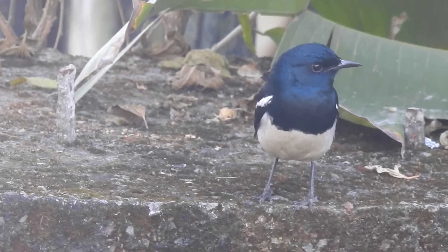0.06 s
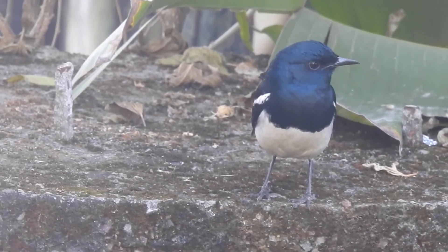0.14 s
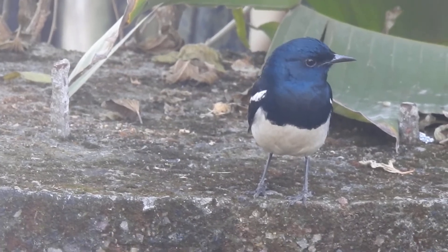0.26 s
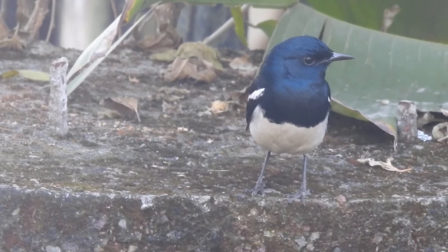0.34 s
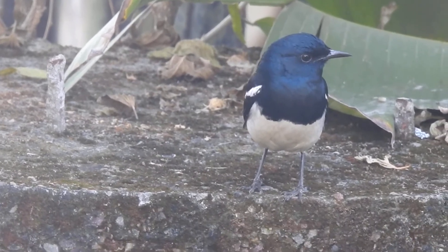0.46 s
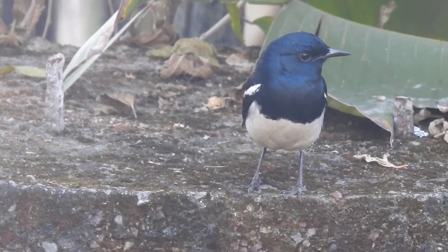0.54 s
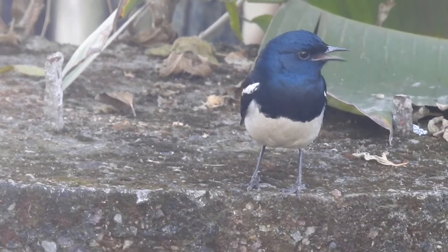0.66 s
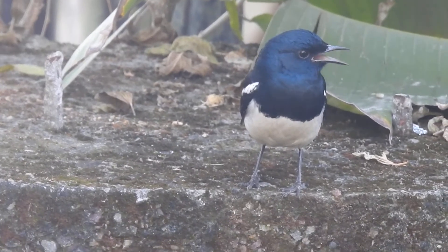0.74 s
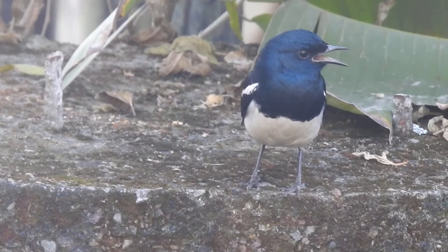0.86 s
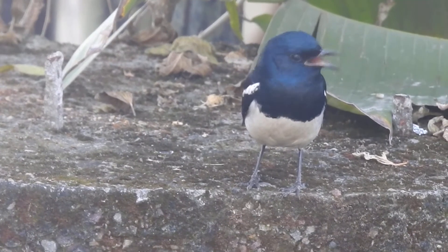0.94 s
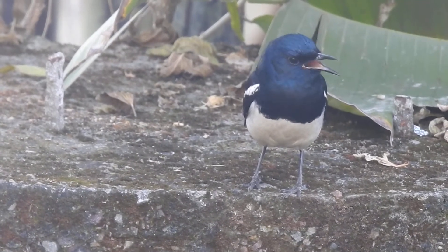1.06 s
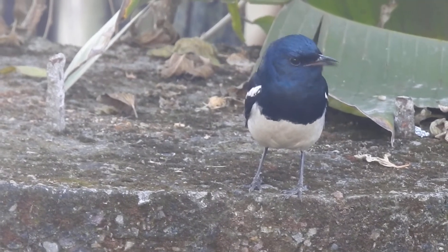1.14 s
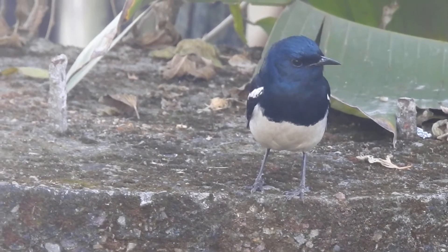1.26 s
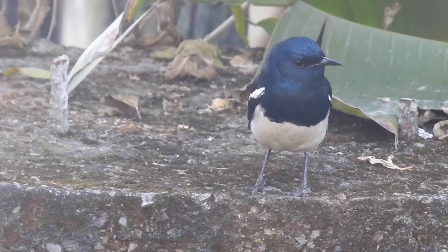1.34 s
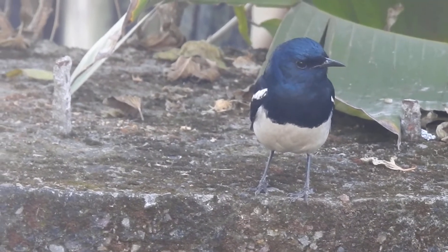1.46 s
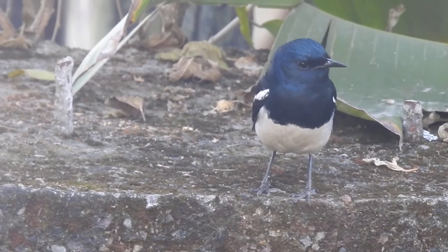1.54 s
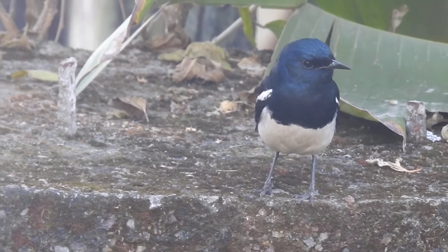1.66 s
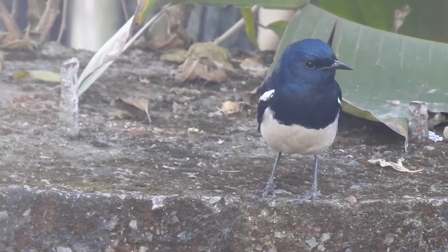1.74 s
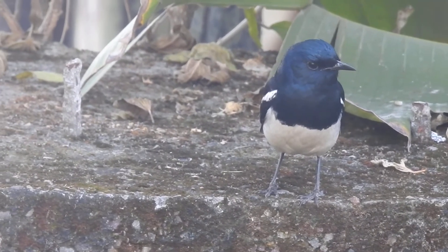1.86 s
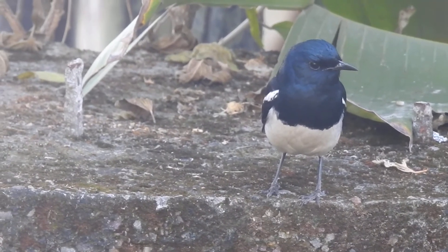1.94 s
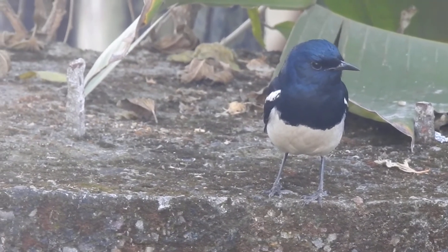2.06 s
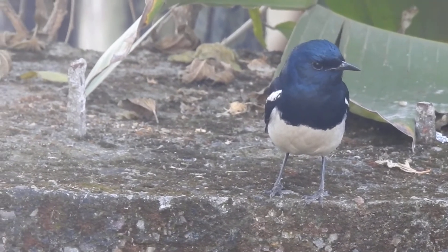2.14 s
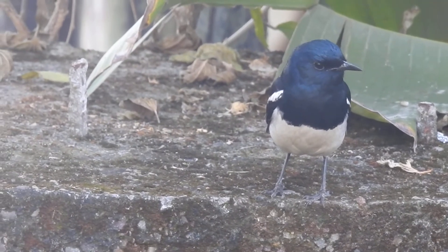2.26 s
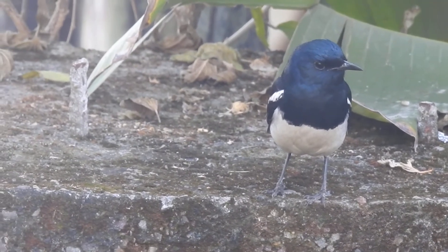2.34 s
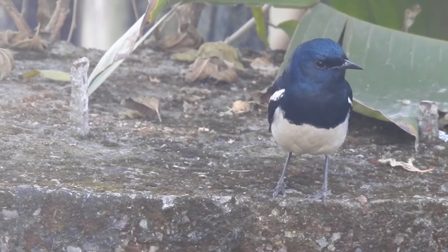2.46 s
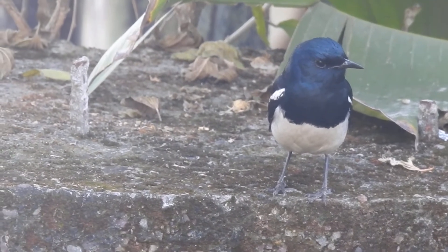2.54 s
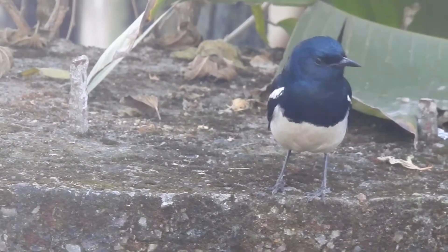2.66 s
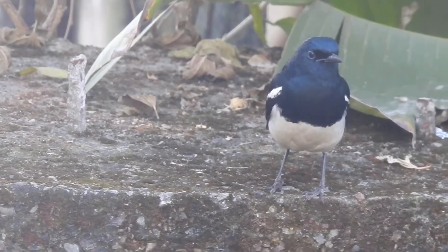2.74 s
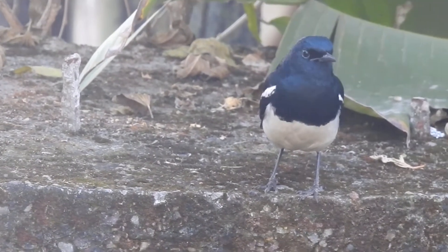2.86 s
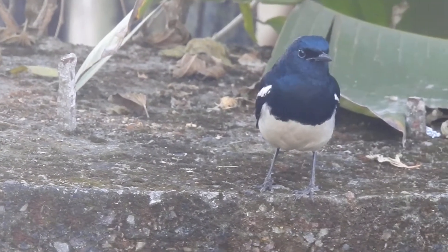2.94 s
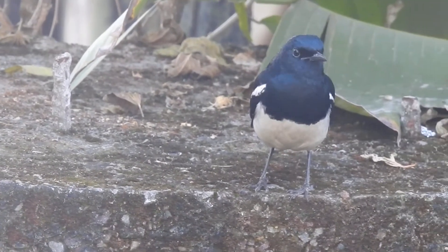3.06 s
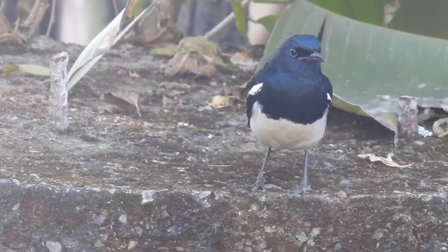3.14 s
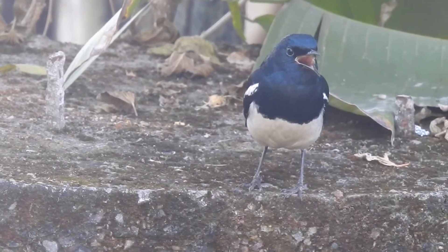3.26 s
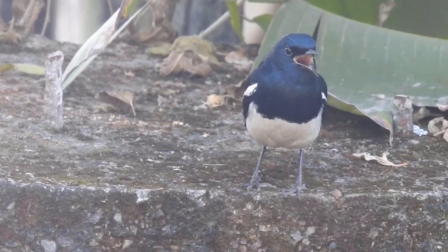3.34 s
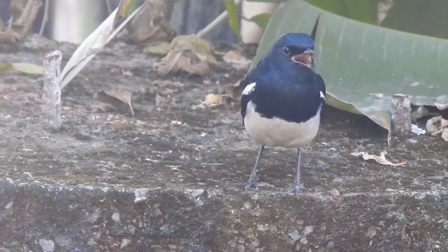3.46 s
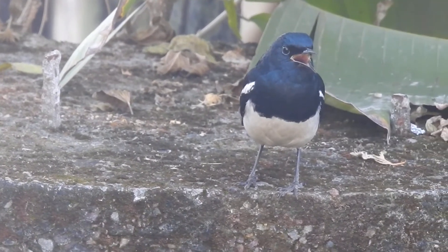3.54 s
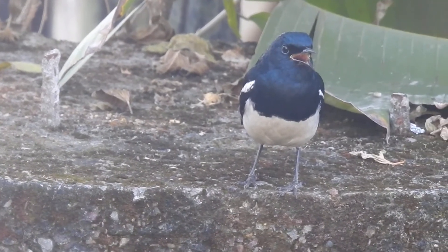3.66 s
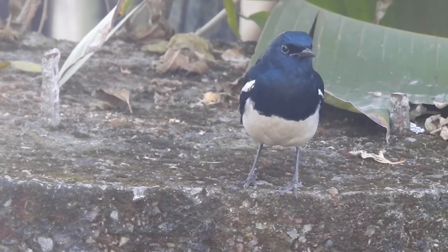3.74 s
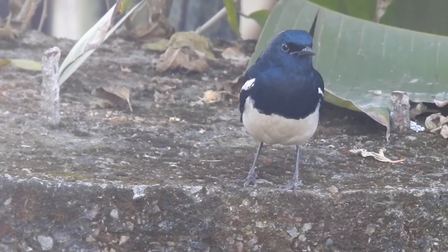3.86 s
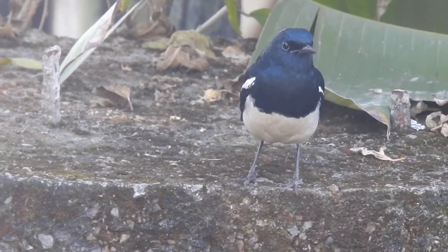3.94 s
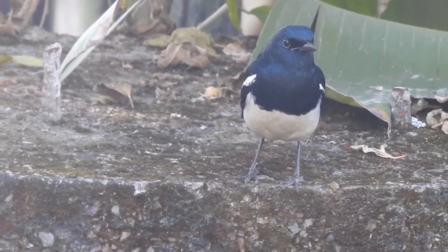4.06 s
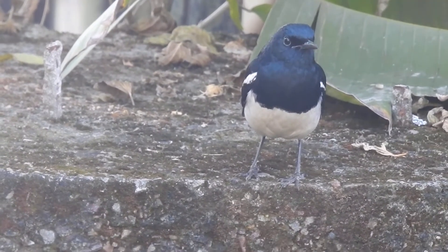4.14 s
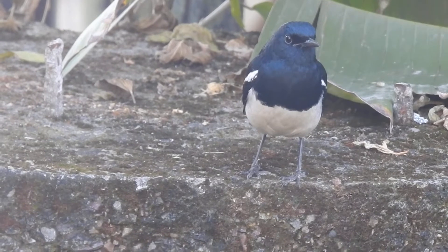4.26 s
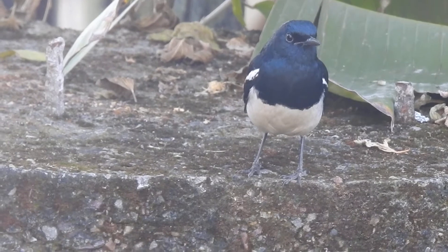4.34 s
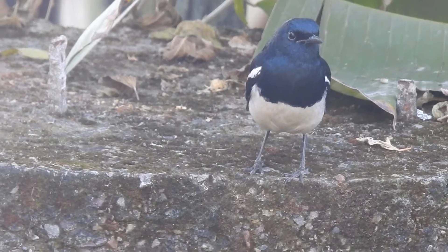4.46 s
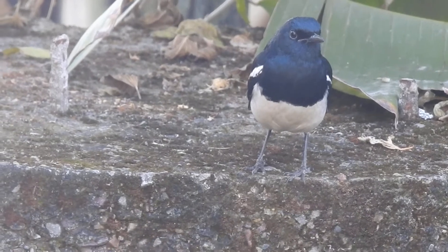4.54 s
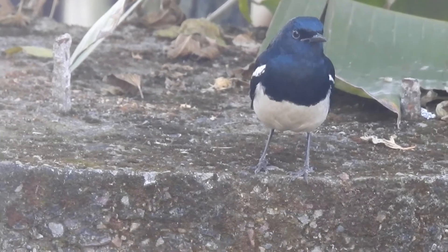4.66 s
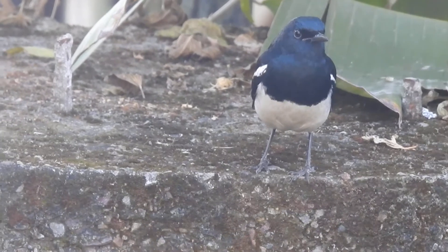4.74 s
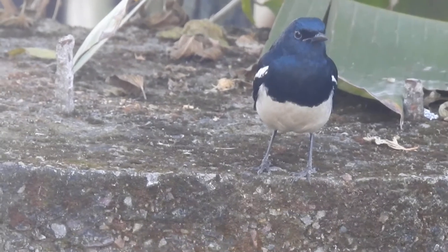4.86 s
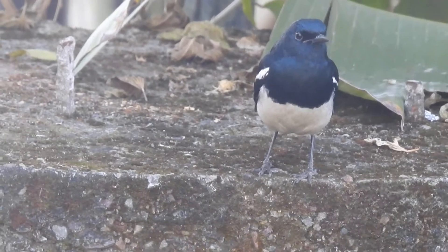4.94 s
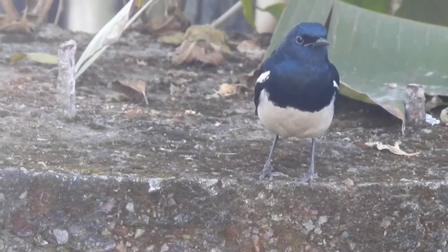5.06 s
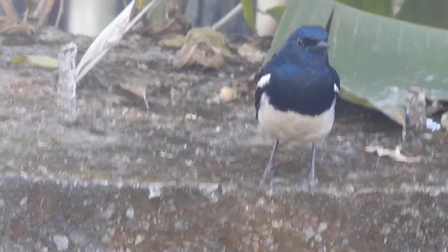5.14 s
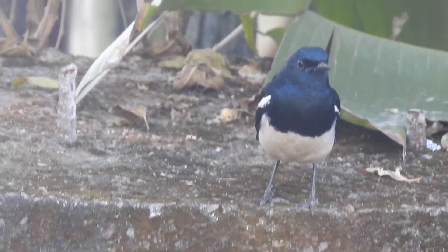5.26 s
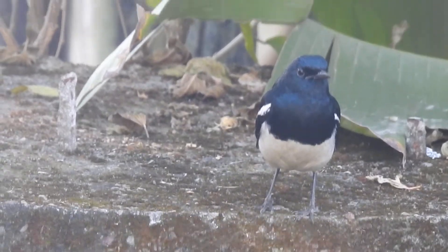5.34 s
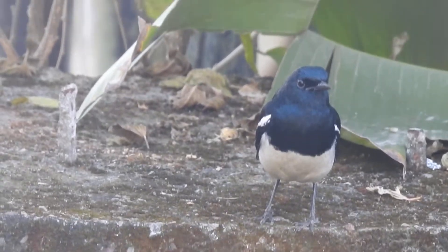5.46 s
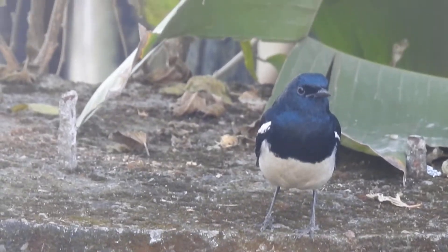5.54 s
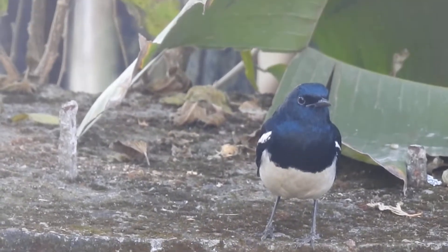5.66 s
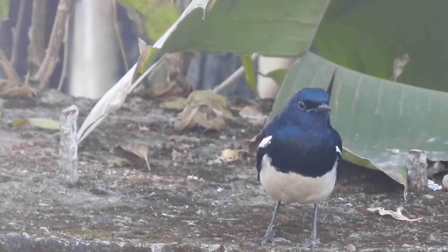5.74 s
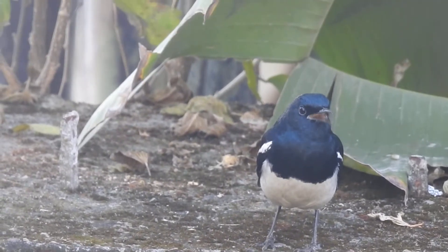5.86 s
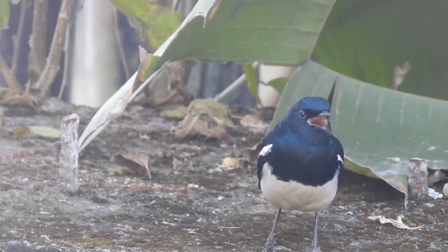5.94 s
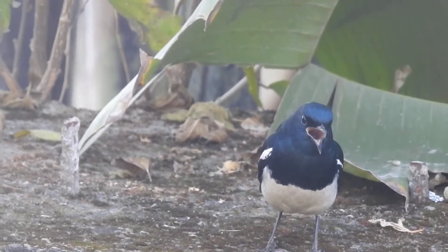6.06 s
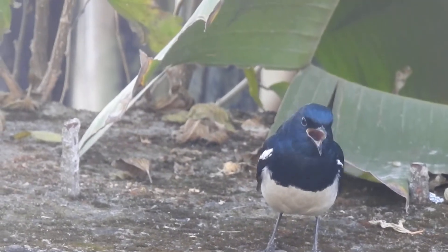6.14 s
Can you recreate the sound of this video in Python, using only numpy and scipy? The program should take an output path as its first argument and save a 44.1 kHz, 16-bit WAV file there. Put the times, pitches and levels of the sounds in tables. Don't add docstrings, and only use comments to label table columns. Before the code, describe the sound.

Three loud, sliding-down bird whistles, spaced about two and a half seconds apart, echo lightly in a garden with soft wind buffeting and distant road noise.

```python
import sys
import numpy as np
from scipy import signal
from scipy.fft import rfft, irfft
from scipy.io import wavfile
from scipy.ndimage import uniform_filter1d

SR = 44100
rng = np.random.default_rng(int(sys.argv[2]) if len(sys.argv) > 2 else 0)


def output_pcm(signal):
    pcm = np.clip(np.atleast_2d(signal).T, -1, 1) * 32767
    wavfile.write(sys.argv[1], SR, np.round(pcm).astype(np.int16))


def makeup_ratio(level_db):
    decades = np.asarray(level_db, float) / 20
    return 10 ** decades


N = 273861
TIME_S = np.arange(N) / SR

# time in seconds, pitch in Hz.
CALL_PITCH = [
    [(.712, 6370), (.78, 5600), (.87, 5250), (.96, 5115), (1.02, 5085), (1.16, 4575), (1.205, 4515)],
    [(3.243, 6260), (3.33, 5650), (3.435, 5205), (3.52, 5055), (3.6, 5015), (3.7, 4545), (3.745, 4385)],
    [(5.915, 6150), (5.968, 5745), (6.025, 5615), (6.065, 5385), (6.15, 5305), (6.21, 5190)],
]
# time in seconds, level in dB.
BREATH = [
    [(0.712, -21.5), (0.724, -13), (0.74, -10), (0.964, -17), (0.992, -13), (1.052, -20), (1.154, -14),
     (1.205, -23.5)],
    [(3.243, -45.5), (3.257, -14), (3.331, -10.5), (3.463, -12), (3.475, -20.5), (3.593, -18.5),
     (3.748, -16)],
    [(5.915, -20), (5.929, -17), (6.003, -6.5), (6.013, -12), (6.027, -10), (6.163, -12.5), (6.21, -13)],
]
# onset in seconds, strongest moment in seconds, strongest level in dB,
# moment the second harmonic is full in seconds, its level in dB.
HUSKINESS = [
    (0.968, 1.139, -46.5, 0.92, -51.5),
    (3.457, 3.585, -44, 3.99, -40),
    (6.045, 6.218, -44.5, 6.08, -59.5),
]
# first frequency in Hz, climb in Hz per second,
# unsteadiness in Hz.
SECOND_VIBRATION = [
    (1350, 700, 170),
    (1300, 2000, 60),
    (1280, 150, 45),
]
# multiple of the pitch, multiple of the second vibration, level in dB.
SIDE_TONES = [
    (1, -1, -8),
    (1, 1, -7),
    (2, -1, -11.5),
]
# frequency in Hz, density in dB per Hz.
AIR_LEAK = [(2500, -30), (3400, -6.5), (4300, -2), (6500, -1), (8500, -10.5), (9800, -24), (10600, -33),
            (15000, -45)]
# time in seconds, peak in dB.
LIMITER_SPITS = [(0.7344, -52), (0.739, -58), (0.7543, -52.5), (0.768, -54.5), (0.7887, -55), (0.7986, -49),
                 (0.818, -48.5), (0.8367, -48.5), (0.8474, -53), (3.274, -56.5), (3.2917, -56),
                 (3.3074, -54), (3.3194, -52), (3.3325, -48.5), (3.357, -56.5), (3.377, -59.5),
                 (3.3895, -54.5), (3.405, -48.5), (3.425, -53), (3.4438, -54), (5.9838, -50),
                 (6.0013, -55.5), (6.03, -50), (6.0516, -52.5), (6.0997, -50), (6.123, -54),
                 (6.1499, -52.5), (6.1837, -58.5)]
# start in seconds, length in seconds, first pitch in Hz, last pitch in Hz,
# level in dB.
FAR_NOTES = [
    (2.401, 0.038, 3180, 3396, -42),
    (2.533, 0.056, 3150, 2720, -45.5),
    (2.621, .12, 3174, 2710, -46.5),
]
# time in seconds, level in dB.
WIND_LEVEL = [(0.0, -58.5), (1.33, -56.5), (1.45, -67), (2.33, -65), (3.08, -44.5), (3.32, -50.5),
              (3.82, -56), (3.98, -48), (4.12, -46), (4.53, -46), (4.74, -36), (4.82, -36), (4.95, -44.5),
              (5.41, -49), (5.71, -56), (6.21, -69.5)]
# time in seconds, peak in dB.
PRESSURE_PUFFS = [(2.575, -31.5), (2.608, -28), (2.65, -28), (2.811, -32.5), (2.955, -27.5), (3.108, -28),
                  (3.14, -28.5), (3.177, -21.5), (3.207, -30), (3.493, -31.4), (4.091, -29), (4.124, -28),
                  (4.185, -31), (4.209, -30.5), (4.652, -25), (4.696, -10), (4.738, -12), (4.783, -18.5),
                  (4.815, -25), (4.847, -23), (4.915, -27.5), (5.188, -29), (5.304, -29.5), (5.359, -24)]
# start in seconds, end in seconds.
EDDY_TIMES = [
    (3.93, 4.64),
    (4.94, 5.58),
]
# time in seconds, level in dB.
ROAD_LEVEL = [(0.0, -52.5), (0.33, -52), (0.86, -56), (1.19, -58), (1.4, -56), (1.47, -52), (1.9, -53.5),
              (2.28, -52.5), (2.82, -54.5), (3.39, -59), (3.87, -56.5), (4.4, -57.5), (5.26, -56),
              (5.57, -57), (5.66, -54.5), (5.9, -52), (5.98, -57), (6.21, -57)]
# frequency in Hz, density in dB per Hz.
TRAFFIC_SPECTRUM = [(76, -47), (130, -7), (155, -4.5), (407, -9.5), (635, -10.5), (977, -14), (1260, -14.5),
                    (1640, -16), (4500, -19.5), (5850, -60.5), (9900, -120)]
# centre in seconds, length in seconds, rise in dB.
RUMBLE_REVS = [
    (0.08, 0.04, 8),
    (1.85, 0.27, 6.5),
    (3.72, 0.11, 3),
    (4.08, 0.1, 8),
    (5.9, 0.16, 5.5),
]
# centre in seconds, length in seconds, rise in dB.
DRONE_REVS = [(0.38, 0.24, 16.4), (1.12, 0.093, 16.3), (2.3, 0.22, 13.5), (2.7, 0.25, 11.3),
              (2.99, 0.069, 13), (3.4, 0.19, 9.1), (3.8, 0.044, 9), (4.36, .06, 10), (4.7, .15, 9.8),
              (5.2, 0.28, 12.6), (5.8, 0.23, 9), (6.07, 0.045, 8.3)]
# frequency in Hz, density in dB per Hz.
INSECT_SPECTRUM = [(1500, -33.5), (3300, -11.5), (4180, -7.5), (4750, -5), (6020, -0.5), (6700, -1),
                   (7160, -7), (8000, -14.5), (9300, -21), (11000, -27), (15800, -29.5)]
# frequency in Hz, left-right likeness from 0 to 1.
COHERENCE = [(60, 0.7), (230, 0.78), (890, 0.79), (1740, 0.63), (3420, 0.67), (6710, 0.14), (12000, 0.2)]


def whistles():
    third_db = -18.5
    throat_cut_hz = 8900
    rasp_onset_db = -47
    second_start_db = -74
    throat = signal.butter(12, throat_cut_hz, fs=SR, output="sos")
    out, air = np.zeros(N), coloured(AIR_LEAK)
    for glide, breath, husky, vibration in zip(CALL_PITCH, BREATH, HUSKINESS, SECOND_VIBRATION):
        start_s, end_s = breath[0][0], breath[-1][0]
        pitch_hz = uniform_filter1d(in_time(glide)[0], size=900)
        phase = 2 * np.pi * np.cumsum(pitch_hz + 8 * drift(60.0)) / SR
        first_hz, climb_hz, waver_hz = vibration
        husk_hz = first_hz + climb_hz * (TIME_S - husky[0]) + waver_hz * drift(120.0)
        husk_phase = 2 * np.pi * np.cumsum(husk_hz) / SR

        level_db, = in_time(breath)
        rasp_db = rasp(start_s, end_s, husky)
        second_db, = in_time([(start_s, second_start_db), husky[3:]])
        tone = makeup_ratio(level_db - 1.0) * np.sin(phase)
        harmonics = np.sin(2 * phase) + makeup_ratio(third_db) * np.sin(3 * phase)
        tone += makeup_ratio(second_db + 3.1 * drift(40.0)) * harmonics

        sides = sum(makeup_ratio(db) * np.sin(k * phase + m * husk_phase) for k, m, db in SIDE_TONES)
        sides = signal.sosfilt(throat, sides)
        sides_db = rasp_db + 8.0 + 1.5 * np.minimum(rasp_db - rasp_onset_db, 0)
        tone += makeup_ratio(sides_db) * sides + makeup_ratio(rasp_db + 2.5) * air
        out += np.sqrt(2) * tone * gate(breath, 0.0037, 0.0017)
    return out


def rasp(start_s, end_s, husky):
    clear_db = -66
    step_s, step_db, end_db = 0.025, -6, -15.5
    onset_s, top_s, top_db = husky[:3]
    return in_time([(start_s, clear_db),
                    (onset_s - step_s, clear_db),
                    (onset_s + step_s, top_db + step_db),
                    (top_s, top_db),
                    (max(end_s, top_s) + 1e-3, top_db + end_db)])[0]


def garden(x):
    near_t60_s, near_db, far_t60_s, far_db = 0.19, -3.5, 0.61, -9.5
    wall_s, wall_db = 0.024, -16
    t = np.arange(int(1.2 * SR)) / SR
    common, own = rng.standard_normal(len(t)), rng.standard_normal((2, len(t)))
    sparse = rng.random(len(t)) < 900 / SR
    near = (common + 1.4 * own) * sparse * makeup_ratio(-60 * t / near_t60_s) * (t > 0.004)
    far = np.roll(common, 999) + 1.3 * own[::-1]
    far = far * makeup_ratio(-60 * t / far_t60_s) * np.clip(t / 0.057, 0, 1)
    echo = makeup_ratio(near_db) * near / np.sqrt(np.sum(near ** 2) / 2)
    echo += makeup_ratio(far_db) * far / np.sqrt(np.sum(far ** 2) / 2)
    echo[:, int(wall_s * SR)] += makeup_ratio(wall_db)
    echo = signal.sosfilt(signal.butter(2, 7000, fs=SR, output="sos"), echo)
    return signal.fftconvolve(x[None], echo, axes=1)[:, :N]


def spits():
    length_s, gain_db = 0.0028, 2
    after_s, after_db = 0.006, -5
    shape = np.zeros(N)
    for (s, db), (u, v) in zip(LIMITER_SPITS, rng.standard_normal((40, 2))):
        follower_s = s + after_s * (1 + u)
        follower_db = db + gain_db + after_db + 3 * v
        shape += makeup_ratio(db + gain_db) * np.exp(-((TIME_S - s) / length_s) ** 2)
        shape += makeup_ratio(follower_db) * np.exp(-((TIME_S - follower_s) / length_s) ** 2)
    noise = rng.standard_normal(N) + 0.5 * rng.standard_normal((2, N))
    bright = signal.butter(1, [3000, 12000], "band", fs=SR, output="sos")
    return shape * rms_one(signal.sosfilt(bright, noise))


def wind():
    puff_hz, puff_hz_per_db = 57.8, 1.0
    eddy_gap_s, eddy_db, eddy_spread_db = 0.045, -37, 4
    gust_db, = in_time(WIND_LEVEL)
    band = signal.butter(2, [35, 80], "band", fs=SR, output="sos")
    low = signal.sosfilt(band, rng.standard_normal((2, N)))
    out = makeup_ratio(gust_db - 1 + 1.9 * drift(9.3)) * rms_one(low) * makeup_ratio([[-8], [3]])

    eddy_s = np.concatenate([np.arange(a, b, eddy_gap_s) for a, b in EDDY_TIMES])
    chance = rng.standard_normal((80, 2))
    eddies = [(s + 0.009 * u, eddy_db + eddy_spread_db * v) for s, (u, v) in zip(eddy_s, chance)]
    for s, peak_db in list(PRESSURE_PUFFS) + eddies:
        x = np.pi * (puff_hz + puff_hz_per_db * (peak_db + 30)) * (TIME_S - s)
        push = (1 - 2 * x ** 2 - 0.74 * x) * np.exp(-x ** 2)
        out += makeup_ratio(peak_db) * push * makeup_ratio([[-24], [0]])
    return signal.sosfiltfilt(signal.butter(2, 28, "high", fs=SR, output="sos"), out)


def far_bird():
    sag_db, wobble_hz = -6, 70
    wobble = wobble_hz * np.sin(2 * np.pi * 55 * TIME_S)
    out = np.zeros(N)
    for s, length_s, first_hz, last_hz, db in FAR_NOTES:
        rows = [(s, first_hz, db - 6.5),
                (s + length_s / 3, first_hz * 0.8 + last_hz * 0.18, db),
                (s + length_s, last_hz, db + sag_db)]
        hz, level_db = in_time(rows)
        phase = 2 * np.pi * np.cumsum(hz + wobble) / SR
        flutter = 0.9 + 0.7 * drift(320.0)
        out += makeup_ratio(level_db) * flutter * np.sin(phase) * gate(rows, 0.0092, 0.0087)
    return out


def background(birds):
    traffic_db, = in_time(ROAD_LEVEL)
    rumble_db = -53.5 + swells(RUMBLE_REVS)
    drone_db = -60 + swells(DRONE_REVS)
    insects_db = -47 + swells([(top_s, 0.15, 3.5) for _, top_s, *_ in HUSKINESS])
    far = makeup_ratio(rumble_db) * narrow_noise(95.4, 45)
    far = far + makeup_ratio(drone_db - 7) * gated(narrow_noise(607, 300), depth=0.68)
    far = far + makeup_ratio(traffic_db + 6.5) * gated(stereo_noise(TRAFFIC_SPECTRUM, patchy_db=0.88), depth=0.38)
    hiss = makeup_ratio(insects_db) * gated(stereo_noise(INSECT_SPECTRUM, patchy_db=-0.93), depth=0.08)
    return far * makeup_ratio([[-0.7], [0.7]]) + ducked(hiss, birds)


def swells(rows):
    return sum(db * np.exp(-((TIME_S - s) / length_s) ** 2) for s, length_s, db in rows)


def ducked(hiss, birds):
    top = signal.sosfiltfilt(signal.butter(6, 7700, "high", fs=SR, output="sos"), hiss)
    loudness = np.clip(uniform_filter1d(np.abs(birds), size=1500) / 0.15, 0, 1)
    return hiss + top * (makeup_ratio(-10 * loudness) - 1)


def gated(x, depth):
    cells = signal.stft(x, nperseg=2048)[2]
    power = np.mean(np.abs(cells) ** 2, axis=0) + 1e-20
    usual = uniform_filter1d(uniform_filter1d(power, size=25, axis=0), size=9, axis=1)
    return rms_one(signal.istft(cells * (power / usual) ** depth, nperseg=2048)[1][:, :N])


def stereo_noise(spectrum, patchy_db):
    hz = np.maximum(np.fft.rfftfreq(N, 1 / SR), 1)
    alike = np.clip(at_hz(COHERENCE, hz), 0, 1)
    mid, side = rfft(rng.standard_normal((2, N))) * makeup_ratio(at_hz(spectrum, hz))
    both = np.sqrt(1 + alike) * mid + np.sqrt(1 - alike) * side * [[1], [-1]]
    out = 0
    for octave in range(6, 15):
        share = np.clip(1 - np.abs(np.log2(hz) - octave), 0, 1)
        out = out + makeup_ratio(patchy_db * drift(8.0)) * irfft(both * share, N)
    return rms_one(out)


def narrow_noise(hz, width_hz):
    b, a = signal.iirpeak(hz, hz / width_hz, fs=SR)
    common, own = rng.standard_normal(N), rng.standard_normal((2, N))
    once = signal.lfilter(b, a, common + 0.3 * own)
    return rms_one(signal.lfilter(b, a, once))


def coloured(spectrum):
    hz = np.maximum(np.fft.rfftfreq(N, 1 / SR), 1)
    return rms_one(irfft(rfft(rng.standard_normal(N)) * makeup_ratio(at_hz(spectrum, hz)), N))


def drift(rate_hz):
    r = np.exp(-2 * np.pi * rate_hz * 20 / SR)
    chance = rng.standard_normal(N // 20 + 4002)
    slow = signal.lfilter([1], [1, -2 * r, r * r], chance)[4000:]
    return np.interp(np.arange(N) / 20, np.arange(len(slow)), rms_one(slow))


def gate(rows, rise_s, fall_s):
    rise = np.clip((TIME_S - rows[0][0]) / rise_s, 0, 1)
    fall = np.clip((rows[-1][0] - TIME_S) / fall_s + 1, 0, 1)
    return rise * fall


def in_time(rows):
    s, *columns = np.transpose(rows)
    return [np.interp(TIME_S, s, c) for c in columns]


def at_hz(points, hz):
    point_hz, value = np.transpose(points)
    return np.interp(np.log(hz), np.log(point_hz), value)


def rms_one(x):
    return x / np.sqrt(np.mean(x ** 2) + 1e-20)


def scene():
    birds = whistles() + far_bird()
    return birds * makeup_ratio([[-0.3], [0.3]]) + garden(birds) + background(birds) + wind()


def band_limit(x):
    return signal.sosfilt(signal.butter(12, 15830, fs=SR, output="sos"), x)


def record(dry):
    overload = 0.82
    mix = np.clip(dry + spits(), -overload, overload)
    return band_limit(mix)


dry = scene()
out = record(dry)
output_pcm(out)
```